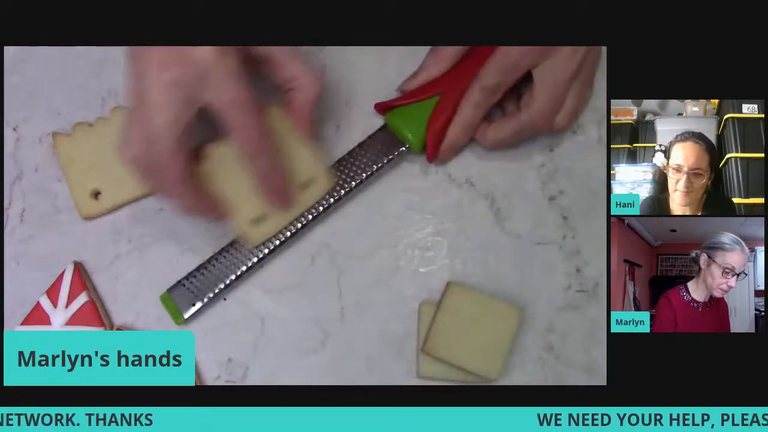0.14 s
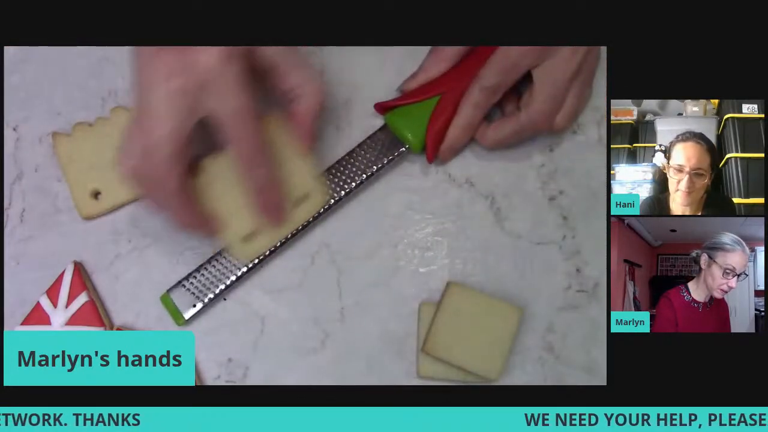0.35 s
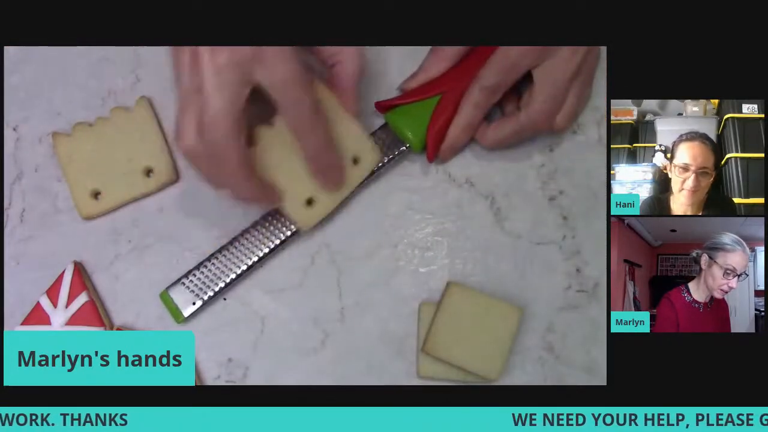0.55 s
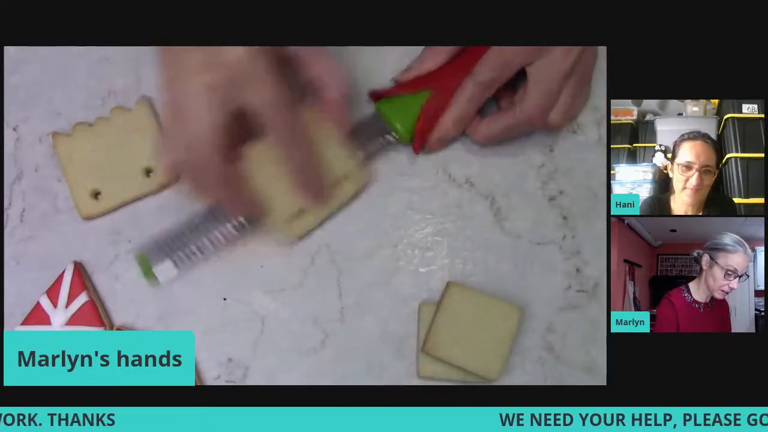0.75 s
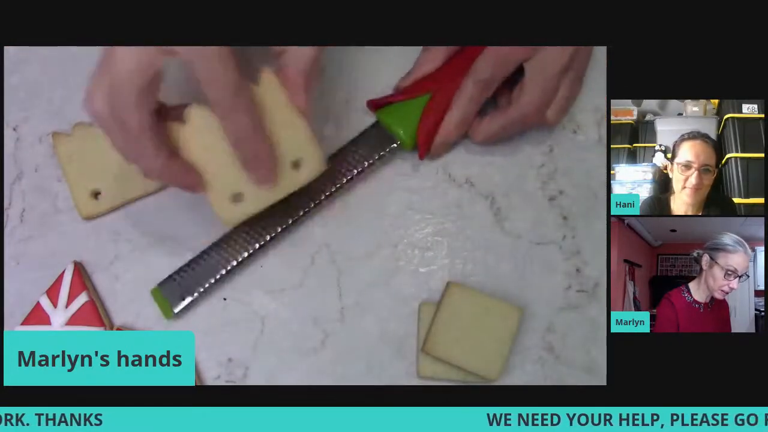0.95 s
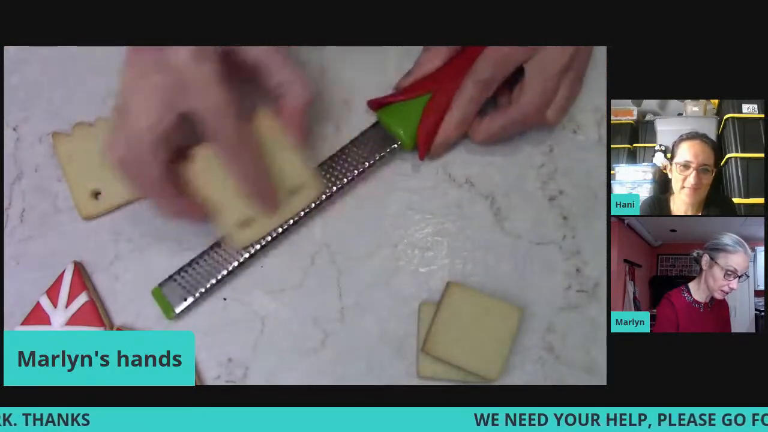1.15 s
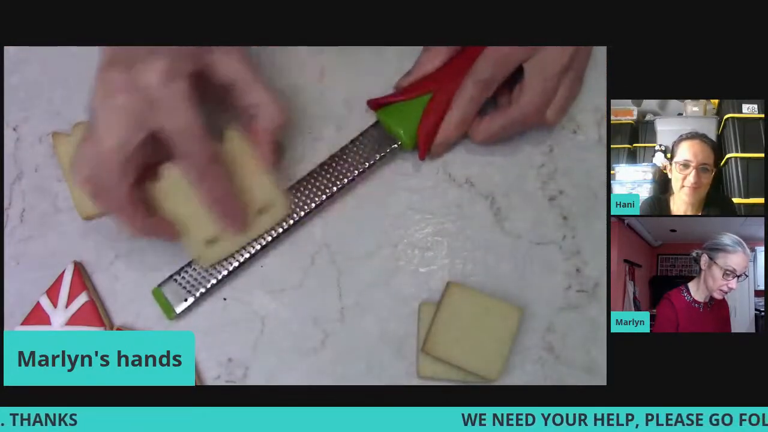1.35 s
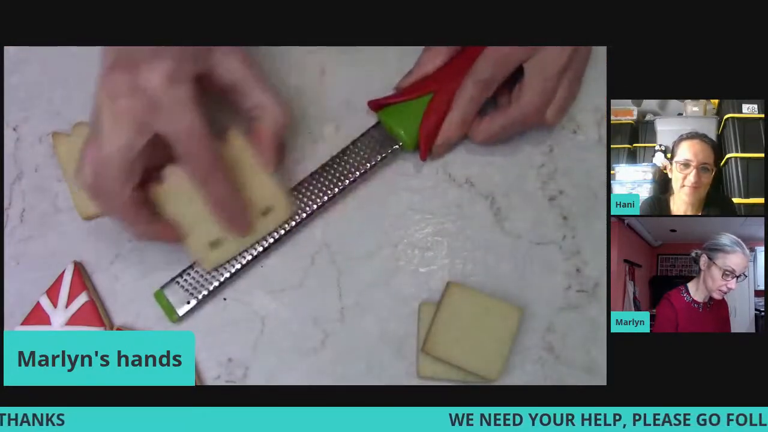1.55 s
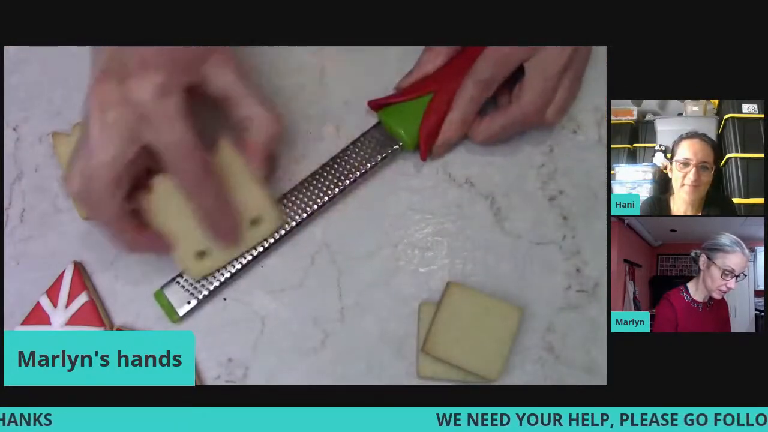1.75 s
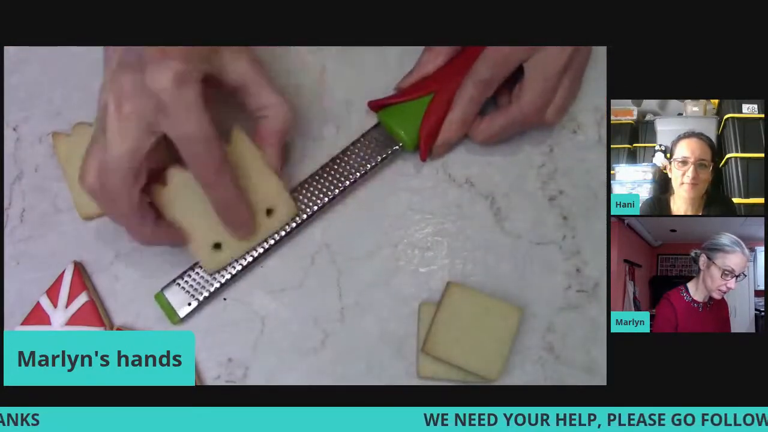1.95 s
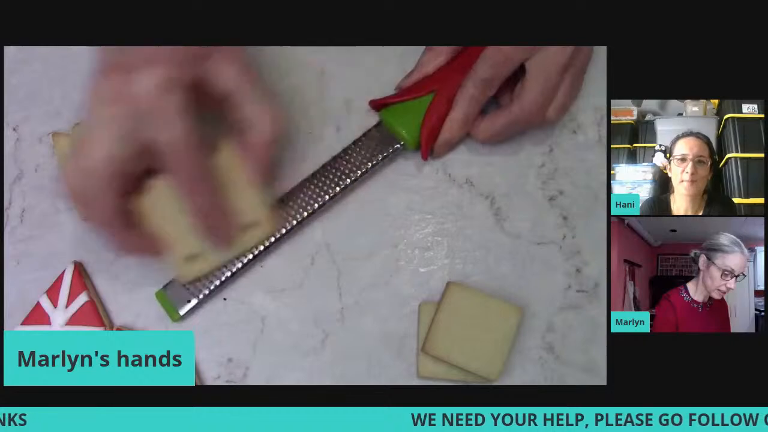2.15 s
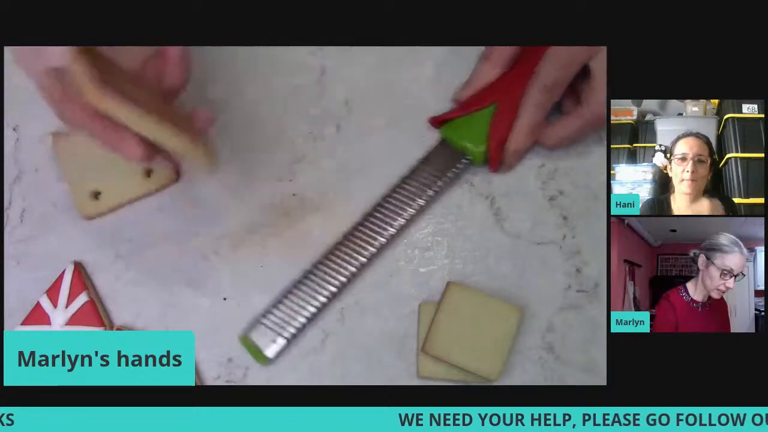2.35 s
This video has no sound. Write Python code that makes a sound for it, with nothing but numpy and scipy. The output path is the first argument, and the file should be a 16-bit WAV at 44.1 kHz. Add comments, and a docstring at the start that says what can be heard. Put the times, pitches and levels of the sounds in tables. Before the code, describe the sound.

A hard cookie is filed back and forth on a steel rasp in quick, crackly strokes with a metallic ring. It stops briefly, the rasp taps the counter softly, then a longer bout follows, close up in a small kitchen.

```python
"""Filing a cookie on a rasp

A baked cookie's edge scrubs back and forth on a long steel rasp, about nine strokes a second, in two
bouts. Each catch of the teeth knocks the blade into ringing, while the breaking crust crackles and
hisses. The rasp slips on the counter, bumps it and is set back. A small kitchen answers, and a noise
suppressor swallows the tails."""
import sys
import numpy as np
from scipy import signal
from scipy.fft import rfft, irfft, next_fast_len
from scipy.io import wavfile
from scipy.ndimage import uniform_filter1d, map_coordinates

SR = 44100
rng = np.random.default_rng(int(sys.argv[2]) if len(sys.argv) > 2 else 0)


def wav_record(signal):
    """Record a signal, one row per channel, as 16-bit PCM in the file named by sys.argv[1]."""
    frames = np.transpose(np.atleast_2d(signal))
    bounded = np.clip(frames, -1, 1)
    # unit amplitude maps onto the largest positive 16-bit level
    quanta = np.round(bounded * 32767).astype(np.int16)
    wavfile.write(sys.argv[1], SR, quanta)


N = 109985

# The hand's strokes. Each row: start and end in seconds, hardest press and fastest point as shares of
# the stroke, relative levels of blade, crackle, hiss and counter in dB, slip 0-1, share of push 0-1.
STROKES = [(-0.062, 0.022, 0.52, 0.22, -19.5, -31.5, -32, -37.5, 0.037, 0.9),
           (0.045, 0.137, 0.69, 0.53, -24.5, -33, -35, -49.5, 0.049, 0.43),
           (0.15, 0.258, 0.68, 0.67, -19.5, -29.5, -32, -62.5, 0.13, 0.12),
           (0.271, 0.374, 0.39, 0.37, -18.5, -25.5, -34, -38.5, 0.0, 0.49),
           (0.403, 0.471, 0.41, 0.53, -18.5, -23.5, -31.5, -32.5, 0.36, 0.59),
           (0.48, 0.539, 0.85, 0.74, -18.5, -27.5, -36.5, -36, 0.56, 0.84),
           (0.538, 0.564, 0.65, 0.34, -14.5, -26.5, -42, -46, 1, 0.88),
           (0.585, 0.662, 0.34, 0.3, -19, -29.5, -39.5, -60, 0.81, 0.3),
           (0.99, 1.101, 0.48, 0.57, -21, -26, -30, -38, 0.39, 0.92),
           (1.108, 1.204, 0.39, 0.5, -18.5, -24.5, -32.5, -33.5, 0.024, 0.43),
           (1.211, 1.319, 0.62, 0.49, -18, -23, -26, -36, 0.093, 0.47),
           (1.324, 1.421, 0.38, 0.42, -17.5, -21, -29.5, -35.5, 0.042, 0.095),
           (1.426, 1.521, 0.52, 0.39, -19, -22, -25, -31, 0.0, 0.94),
           (1.528, 1.618, 0.54, 0.45, -17, -22, -32, -46.5, 0.017, 0.39),
           (1.631, 1.726, 0.46, 0.51, -19.5, -20, -24, -36.5, 0.014, 0.92),
           (1.738, 1.84, 0.25, 0.4, -16.5, -21, -30, -41, 0.0, 0.18),
           (1.847, 1.945, 0.5, 0.34, -19, -21, -24.5, -33, 0.074, 0.69),
           (1.947, 2.047, 0.61, 0.39, -19, -23, -32, -40.5, 0.017, 0.13),
           (2.055, 2.157, 0.42, 0.37, -18, -19.5, -27, -60.5, 0.066, 0.35)]
# What lingers at the turn of a stroke. Each entry: layer, level in dB relative to its stroke.
TURN_DB = {"blade": -23, "crackle": -20, "hiss": -18}
# The blade's ring. Each row: pitch in Hz, width in Hz, relative level in dB when pulled, when pushed.
BLADE_MODES = [(523.7, 16, -18, -15), (583, 16, 0.5, -9), (659.7, 33, 7, -9), (883, 65, -0.5, -5.5),
               (988.7, 57, -5.5, 2), (1255, 55, 0, -11), (1420, 48, -19.5, -5), (1733, 88, -2, -7.5),
               (1982, 82, -7, -5), (2584, 69, -4.5, -7.5)]
# The steel's high shimmer. Each row: pitch in Hz, width in Hz, relative level in dB.
STEEL_MODES = [(3520, 170, 3.5), (4226, 120, 5.5), (7056, 220, 2)]
# Tone curves for the firm rasp, the slipping rasp, breaking crust, fine crumbs, the counter, the rasp
# touching down and the noise floor. Each row: frequency in Hz, relative level in dB.
FIRM_TONE = [(60, -45), (150, -37.5), (250, -27), (400, -15), (520, 6), (750, 3), (1100, 3.5), (1550, -6.5),
             (2100, -18.5), (2900, -14.5), (5000, -21), (9000, -69)]
SLIP_TONE = [(60, -39.5), (160, -16.5), (300, -10.5), (440, 3), (850, 0), (1350, -1), (1900, -13),
             (2700, -25), (7000, -53)]
CRACKLE_TONE = [(200, -57.5), (1000, 0), (2200, 0), (3100, -5), (4600, -2), (6200, 0), (8000, -12),
                (10000, -14), (15000, -22)]
HISS_TONE = [(3000, -36.5), (7000, -3.5), (10800, -8), (12500, -7), (15500, -7.5), (17000, -4)]
COUNTER_TONE = [(25, -21.5), (105, -26.5), (150, -2), (190, -3.5), (245, 1), (330, -1.5), (700, -7),
                (2000, -76)]
KNOCK_TONE = [(60, -42.5), (150, 2), (260, 10), (430, 10.5), (700, -29.5), (1450, 5), (2300, -27.5),
              (4400, -34.5), (5600, -19), (7500, -59)]
FLOOR_TONE = [(170, -2), (1200, -16), (12000, -42)]
# A tooth snags. Each row: start in seconds, strength in dB, pitch in Hz (set by where the blade is held).
SNAGS = [(.165, -13, 900), (.307, -14, 690), (.413, -11, 760), (.510, -8.5, 860), (.551, -8, 960),
         (.603, -13, 600), (1.642, -14, 720), (1.769, -9.5, 790), (1.967, -9, 740)]
# The closing judder. In order: start and end in seconds, first and last pitch in Hz, level in dB.
SLIDE_OFF = (2.105, 2.15, 760, 470, -16)
# The released blade. In order: pitch in Hz, level in dB, seconds to fall 60 dB.
FREE_RING = (985, -34.5, 0.37)
# The rasp touches down on the counter. Each row: start in seconds, level in dB.
TOUCHDOWNS = [(0.949, -31.5), (.960, -32.5), (0.974, -49.5)]
# Dull thuds. Each row: start in seconds, level in dB, pitch in Hz, seconds to fall 60 dB.
BUMPS = [(0.524, -23, 39.4, 0.11), (0.53, -20.5, 141, 0.033)]
# The kitchen's decay. Each row: frequency in Hz, seconds to fall 60 dB.
ROOM_DECAY = [(100, .45), (400, .18), (1400, .235), (3000, .21), (12000, .125)]
# The kitchen's reverb send. Each row: frequency in Hz, level in dB.
ROOM_SEND = [(100, -5.5), (1200, -5), (4000, -8.5), (12000, -13.5)]
# The noise suppressor. Each row: frequency in Hz, threshold in dB.
GATE_THRESHOLD = [(100, -65), (400, -47.5), (1200, -67.5), (3000, -70.5), (15000, -85)]

JUDDER_RAD, JUDDERS_PER_S = .5, 160  # phase shake that roughens the blade's notes


def blade():
    """Teeth catch and knock the blade: a push favours its upper ring, a slip turns it lower and duller."""
    _, _, press, _, level_db, _, _, _, slip, push = np.transpose(STROKES)
    slip, push = np.clip([slip, push], .001, .999)
    hz, width, pull_db, push_db = np.transpose(BLADE_MODES)
    drive = lambda share: stroke_swell(level_db + 10 * np.log10(share), press, TURN_DB["blade"], 0.77)
    snaps = lambda: catches(per_s=2600, spread_db=6.5)
    ring = lambda mode_db: drifting(resonate(snaps(), list(zip(hz, width, mode_db))), detune=.014)
    pulled = drive((1 - slip) * (1 - push)) * ring(pull_db)
    pushed = drive((1 - slip) * push) * ring(push_db)
    clatter = drive(1 - slip) * patchy(coloured(snaps(), FIRM_TONE))
    slide = drive(slip) * patchy(coloured(snaps(), SLIP_TONE))
    return amp(1.02) * (pulled + pushed) + amp(-4.5) * clatter + amp(3.5) * slide


def crust():
    """Breaking crust crackles and rings the steel; fine crumbs hiss; the counter drones along."""
    _, _, _, fastest, _, crackle_db, hiss_db, counter_db, _, _ = np.transpose(STROKES)
    snaps = catches(per_s=4500, spread_db=1.5)
    steel = amp(-4) * drifting(resonate(snaps, STEEL_MODES), detune=.025)
    crackle = patchy(unit(coloured(snaps, CRACKLE_TONE)) + steel)
    crackle *= amp(1) * stroke_swell(crackle_db, fastest, TURN_DB["crackle"])
    hiss = patchy(coloured(catches(per_s=7600, spread_db=4), HISS_TONE))
    hiss *= amp(4.5) * stroke_swell(hiss_db, fastest, TURN_DB["hiss"])
    drone = unit(coloured(catches(per_s=340, spread_db=-1.5), COUNTER_TONE))
    drone *= stroke_swell(counter_db, fastest, TURN_DB["blade"], sharpness=0.18)
    clumps = amp(wobble(per_s=78))  # crumbs break off in clumps, swaying the level by about 1 dB
    return clumps * (crackle + hiss) + drone


def snags(rise_s=.001, fade_s=.007, low_hz=380):
    """A snagging tooth jolts the blade into a short rough note with a burst of grit."""
    t, out = np.arange(N) / SR, np.zeros(N)
    grit = amp(-4) * unit(coloured(rng.standard_normal(N), FIRM_TONE))
    judder = JUDDER_RAD * wobble(2 * JUDDERS_PER_S)
    for start, db, hz in SNAGS:
        age = np.maximum(t - start, 0)
        jolt = amp(db) * (1 - np.exp(-age / rise_s)) * np.exp(-age / fade_s)
        note = np.sqrt(2) * np.sin(2 * np.pi * hz * age + judder)
        out += jolt * (note + grit)
    # cut the bass so each snag is a short rough note without a thump
    return filtered(out, lambda f: (f * f / (f * f - 1j * np.sqrt(2) * f * low_hz - low_hz ** 2)) ** 2)


def slide_off():
    """The blade judders on a falling note as the cookie slides off its end."""
    start, end, from_hz, to_hz, db = SLIDE_OFF
    progress = np.interp(np.arange(N) / SR, [start, end], [0, 1])
    phase = 2 * np.pi * np.cumsum(from_hz + (to_hz - from_hz) * progress) / SR
    swell = amp(db) * np.sin(np.pi * progress) ** 2
    return swell * np.sqrt(2) * np.sin(phase + JUDDER_RAD * wobble(JUDDERS_PER_S))


def free_ring():
    """Released by the last stroke, the blade rings out faintly."""
    hz, db, t60 = FREE_RING
    age = np.maximum(np.arange(N) / SR - SLIDE_OFF[1], 0)
    fade = amp(db - 60 * age / t60) * (age > 0)
    return fade * np.sin(2 * np.pi * hz * age + JUDDER_RAD * wobble(JUDDERS_PER_S))


def knocks(t60=0.18):
    """The rasp is set back on the counter with a short soft rattle."""
    t, rattle = np.arange(N) / SR, rng.standard_normal(N)
    hits = sum((t >= start) * amp(db - 60 * np.abs(t - start) / t60) for start, db in TOUCHDOWNS)
    return coloured(hits * rattle, KNOCK_TONE) / coloured(rattle, KNOCK_TONE).std()


def bumps():
    """Hand and rasp send low thuds through the counter."""
    t, out = np.arange(N) / SR, np.zeros(N)
    for start, db, hz, t60 in BUMPS:
        age = np.maximum(t - start, 0)
        out += amp(db - 60 * age / t60) * np.sin(2 * np.pi * hz * age)
    return out


def kitchen(x, predelay_s=.004):
    """The room's short answer, each frequency dying at its own speed."""
    hz, t, noise = signal.stft(rng.standard_normal(SR // 2), SR, nperseg=256)
    fade = amp(-60 * t / along(ROOM_DECAY, hz)[:, None])
    band_size = np.sqrt(np.mean(fade ** 2, axis=1, keepdims=True) * (SR // 2))
    fade *= amp(along(ROOM_SEND, hz))[:, None] / band_size
    tail = signal.istft(noise * fade, SR, nperseg=256)[1]
    return signal.fftconvolve(x, np.pad(tail, (int(predelay_s * SR), 0)))[:N]


def stroke_swell(levels_db, peaks, turn_db, sharpness=1.0, linger_s=.0085):
    """An envelope that swells and eases once a stroke; the scratch lingers through each turn."""
    t, gain = np.arange(N) / SR, np.zeros(N)
    for (start, end, *_), db, peak in zip(STROKES, levels_db, peaks):
        progress = np.interp(t, [start, start + peak * (end - start), end], [0, .5, 1])
        swell = np.abs(np.sin(np.pi * progress)) ** sharpness
        outside_s = np.maximum(np.maximum(start - t, t - end), 0)
        linger = amp(turn_db) * np.exp(-outside_s / linger_s)
        gain = np.maximum(gain, amp(db) * (swell + linger))
    return gain


def catches(per_s, spread_db):
    """Crumbs snap on the teeth: random clicks of uneven size."""
    hit = rng.random(N) < per_s / SR
    return hit * rng.choice([-1, 1], N) * amp(spread_db * np.clip(rng.standard_normal(N), -2, 2))


def resonate(x, modes):
    """Ring x through a bank of resonances of alternating polarity."""
    return filtered(x, lambda f: sum((-1) ** k * amp(db) * 1j * f * width
                                     / (hz * hz - f * f + 1j * f * width)
                                     for k, (hz, width, db) in enumerate(modes)))


def drifting(x, detune):
    """A ring wanders by a share of its pitch as the cookie travels; comes out at rms 1."""
    playhead = np.cumsum(1 + detune * wobble(per_s=9))
    return unit(map_coordinates(x, [playhead], mode="mirror"))


def patchy(x, depth_db=2.5, patch_hz=301.7, patch_s=.04):
    """The colour shifts in random patches as the cookie damps other parts of the blade; rms 1."""
    bands = signal.stft(x, SR, nperseg=512)[2]
    rows, cols = np.indices(bands.shape)
    grid = [rows * SR / 512 / patch_hz, cols * 256 / SR / patch_s]
    patches = map_coordinates(rng.standard_normal((260, 260)), grid)
    return unit(signal.istft(bands * amp(depth_db * patches), SR, nperseg=512)[1][:N])


def wobble(per_s):
    """A smooth random curve through per_s points a second."""
    return map_coordinates(rng.standard_normal(1000), [np.arange(N) * per_s / SR], mode="wrap")


def coloured(x, tone):
    """Shape x with a tone curve, minimum phase so that attacks stay crisp."""
    def response(hz):
        cepstrum = irfft(np.log(amp(along(tone, hz))))
        half = len(cepstrum) // 2
        cepstrum[1:half] *= 2
        cepstrum[half + 1:] = 0
        return np.exp(rfft(cepstrum))
    return filtered(x, response)


def filtered(x, response):
    """Pass x through a complex frequency response."""
    size = 2 * next_fast_len(N // 2 + SR // 4)
    return irfft(rfft(x, size) * response(np.fft.rfftfreq(size, 1 / SR)), size)[:N]


def along(points, hz):
    """Read a curve of (Hz, value) points on a log frequency axis."""
    point_hz, values = np.transpose(points)
    return np.interp(np.log(hz + 1), np.log(point_hz + 1), values)


def amp(db):
    """Decibels to gain."""
    return 10 ** (np.asarray(db) / 20)


def unit(x):
    """Scale to rms 1."""
    return x / np.sqrt(np.mean(x ** 2) + 1e-20)


def scene():
    """Rasp and cookie feed the kitchen reverb; the thuds and the last ring stay dry."""
    direct = blade() + crust() + knocks() + slide_off() + snags()
    return (direct + kitchen(direct) + bumps() + free_ring())[None]


def record(dry, top_hz=15700):
    """A noise suppressor shuts each weak band over a faint noise floor; the very top is cut off."""
    hz, _, bands = signal.stft(dry[0], SR, nperseg=512)
    power = np.abs(uniform_filter1d(np.abs(bands) ** 2, size=5, axis=0))
    gate = power / (power + amp(along(GATE_THRESHOLD, hz))[:, None] ** 2)
    gated = signal.istft(bands * gate, SR, nperseg=512)[1][:N]
    floor = amp(-80.5) * unit(coloured(rng.standard_normal(N), FLOOR_TONE))
    return filtered(gated + floor, lambda f: (1 - np.tanh((f - top_hz) / 60)) / 2)[None]


dry = scene()
out = record(dry)
wav_record(out)
```